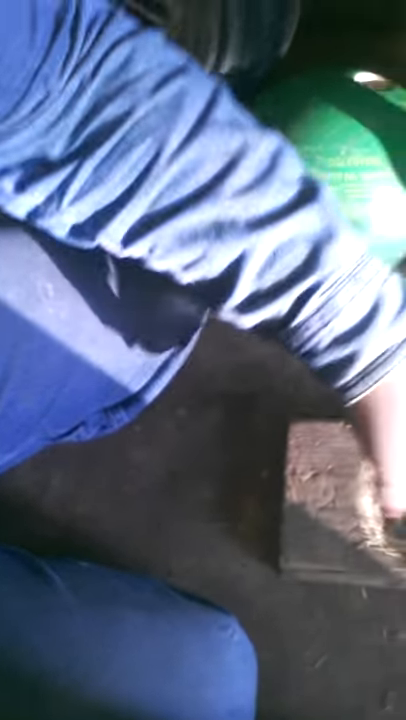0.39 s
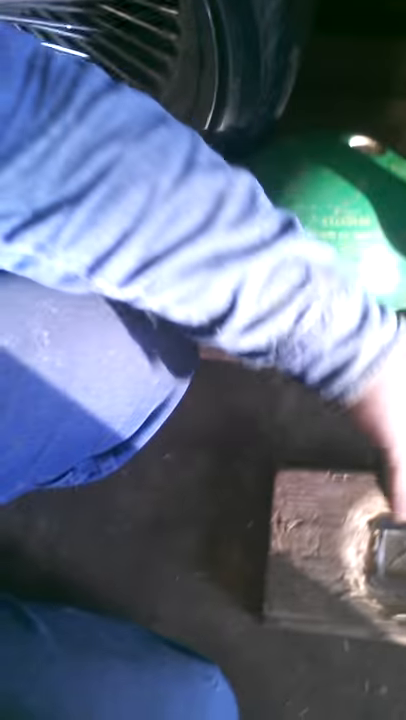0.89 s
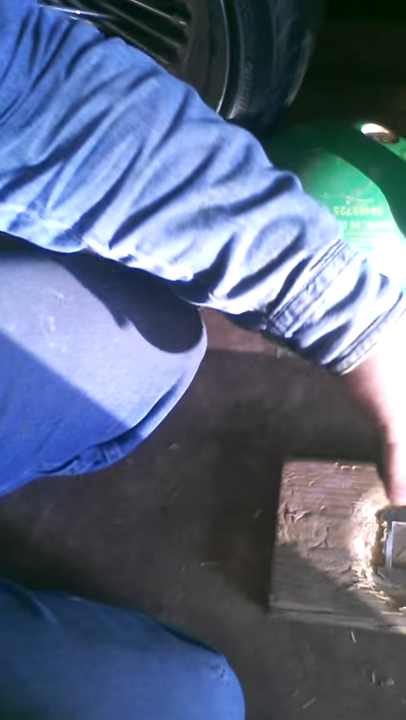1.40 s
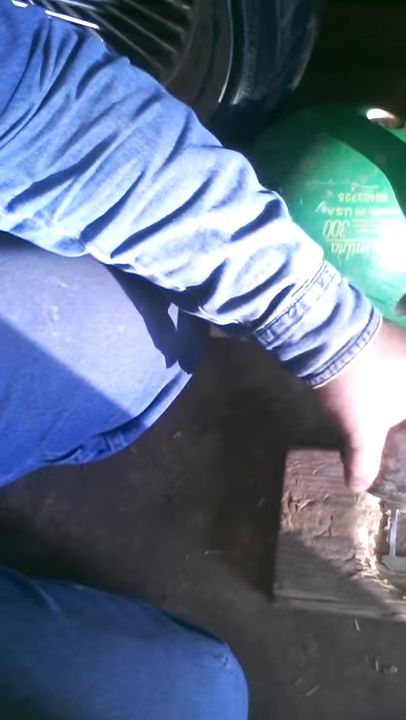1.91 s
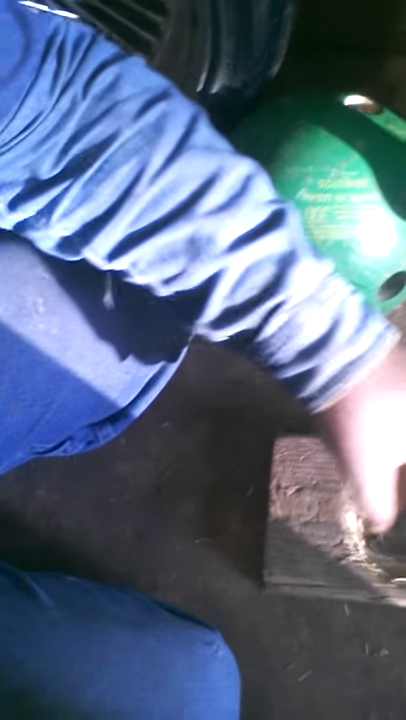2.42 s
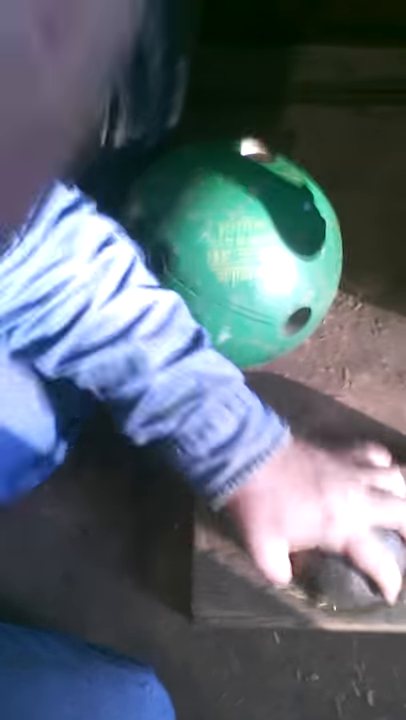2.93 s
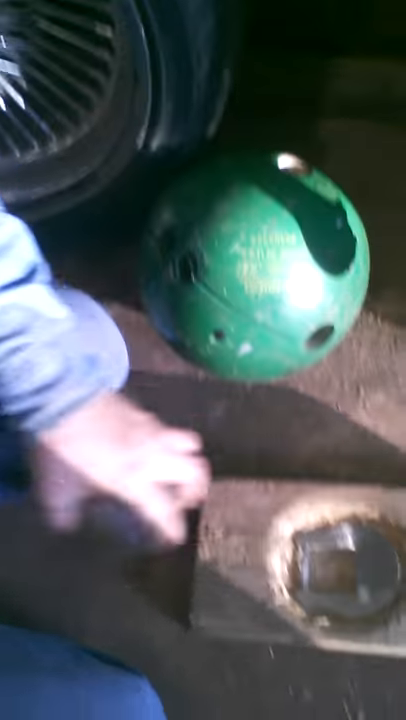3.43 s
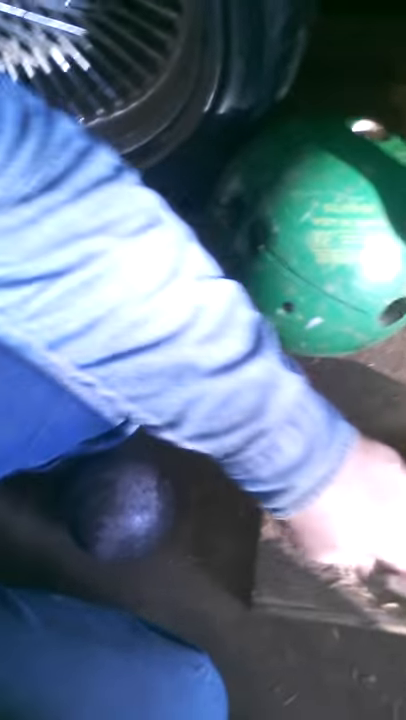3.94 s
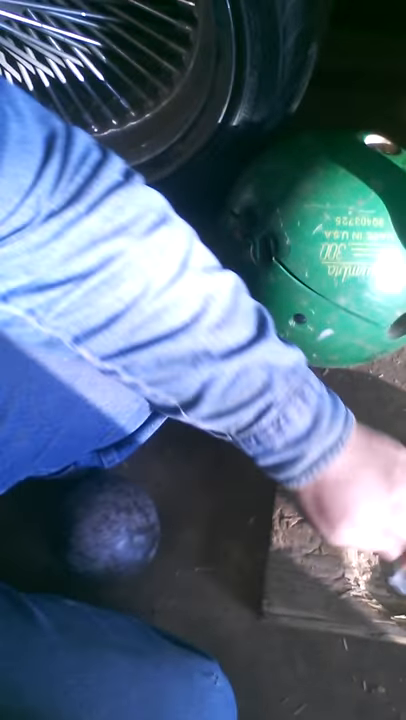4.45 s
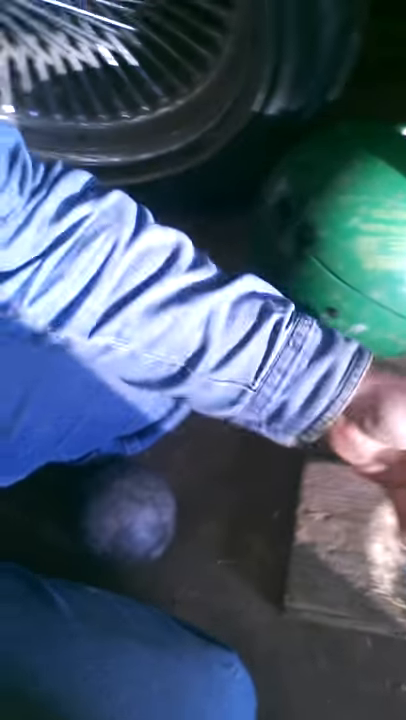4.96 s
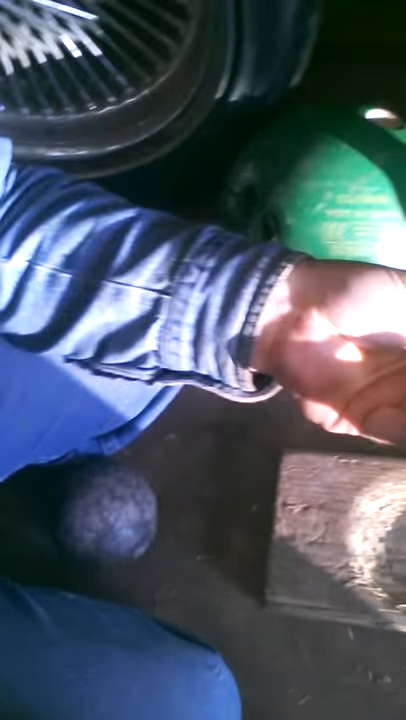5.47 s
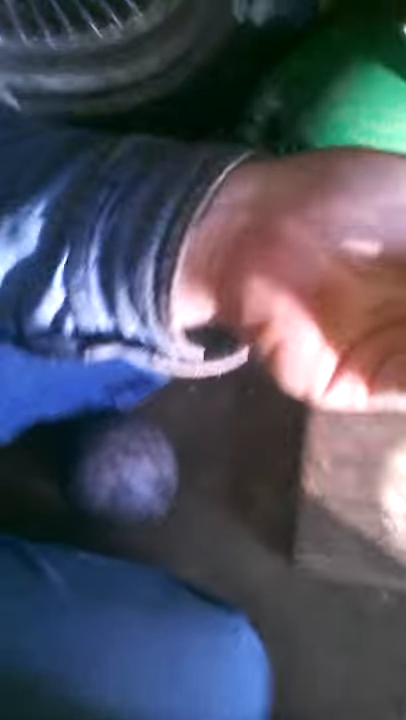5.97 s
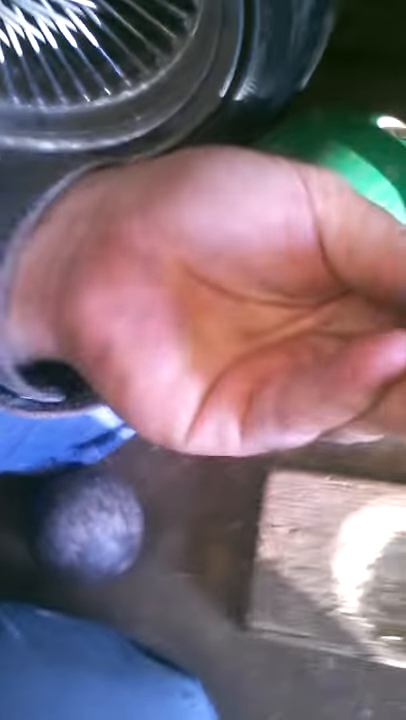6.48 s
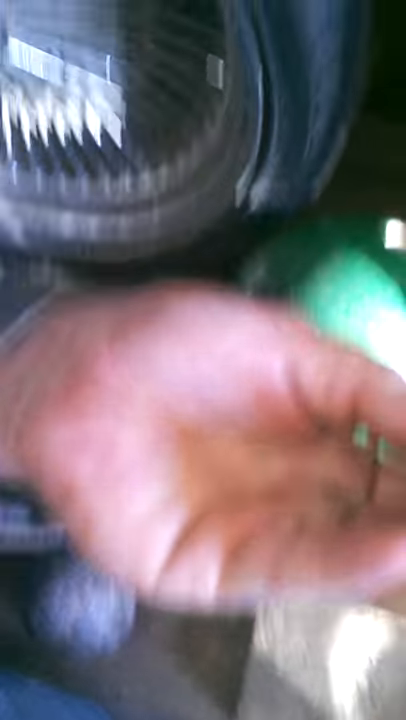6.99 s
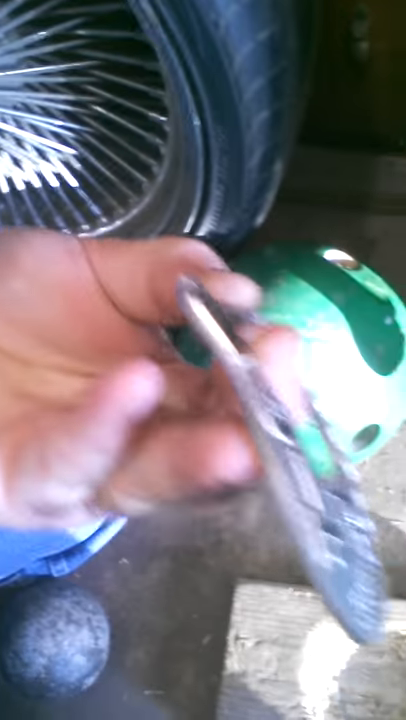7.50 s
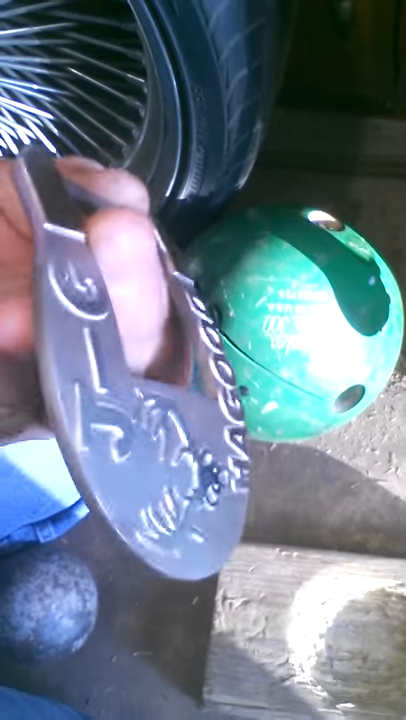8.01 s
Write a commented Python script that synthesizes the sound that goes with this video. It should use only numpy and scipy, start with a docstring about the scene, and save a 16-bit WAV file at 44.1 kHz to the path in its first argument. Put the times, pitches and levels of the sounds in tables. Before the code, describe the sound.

Close stereo pickup, overloading on impacts: one explosive clank of heavy ball on metal, short and dense, with wooden body underneath and a brief room tail. Over two seconds later a second clank, doubled by a rebound and sharp clinks. Soon a heavy floor thud patters into quicker, weaker hops and a faint decaying hum. Two slight metallic ticks, then quiet workshop air: soft distant rush, wavering low hum, hiss, and one thin faint squeak near the end.

```python
"""Heavy ball in a workshop

A heavy ball drops twice on a metal blank in a wooden block: short forces ring resonances, with cracks of noise.
The blank clinks (noise bursts) at the second blow and as it is lifted. Set on the floor, the ball thuds in ever
shorter hops and sets decaying tones humming. A faint squeak (gliding tone), a distant fan-like rush (shaped
noise) and a hum (wavering tones) fill the room; two microphones a hand apart overload on every blow."""
import sys
import numpy as np
from scipy import signal
from scipy.fft import rfft, irfft, next_fast_len
from scipy.io import wavfile
from scipy.ndimage import uniform_filter1d

SR = 44100
rng = np.random.default_rng(int(sys.argv[2]) if len(sys.argv) > 2 else 0)


def volts(x):
    """Linear amplitude factor 10**(x/20) for a level x in dB, scalar or array-like."""
    e = np.asarray(x, float) / 20
    return 10 ** e


def store_pcm(level_fs):
    """Save levels as 16-bit WAV."""
    pcm = np.round(np.clip(level_fs, -1, 1) * 32767).astype(np.int16)
    wavfile.write(sys.argv[1], SR, np.atleast_2d(pcm).T)


N = 358091
TAIL = 30000  # samples kept of each event
SPACING_M = 0.13  # between the microphones
SOUND_M_PER_S = 343


def blows(mix):
    """Steel on steel: a short force rings blank and block, with a crack of noise."""
    # ball on blank, the last a rebound: (time [s], blow [dB], block thud re ring [dB], crack re ring [dB],
    # contrast of the blank's modes [factor on their dB], lower for a blow off the middle)
    strikes = [(0.5729, 18.07, -19, -25.5, 0.82), (2.9739, 17.86, -17, -22, 0.63),
               (3.011, 2, -8, -23.5, .5)]
    # modes of blank and ball: (frequency [Hz], width [Hz], level [dB])
    blank = [(929, 195, -8.5), (1160, 120, -3), (1327, 170, -6), (1714, 228, -0.5), (2117, 200, -2.5),
             (2390, 250, -6.5), (2607, 260, -1.5), (2903, 380, -4.5), (3320, 700, -14), (4480, 1600, -20.5),
             (10400, 4000, -22.5)]
    # modes of the block under the blow: (frequency [Hz], width [Hz], level [dB])
    block = [(154.1, 39, 0), (241, 51, -1), (306, 181, -2), (607, 250, -8)]
    crack_t60_s = 0.0087
    t = np.arange(TAIL) / SR
    for start_s, blow_db, thud_db, crack_db, contrast in strikes:
        crack = volts(crack_db - 60 * t / crack_t60_s) * rng.standard_normal(TAIL)
        blank_modes = [(hz, width_hz, contrast * db) for hz, width_hz, db in blank]
        ring = rung(push(0.00008), blank_modes)
        thud = rung(push(0.00089), block)
        hit = ring + volts(thud_db) * thud + crack
        add(mix, start_s, volts(blow_db) * in_room(hit, wet_db=2.5, share=-0.2, gap_s=0.00057))


def clinks(mix):
    """Small metal contacts: a broad tick and a short burst of noise in one resonance."""
    # contacts of the blank: (time [s], level [dB], pitch [Hz], t60 [s])
    taps = [(2.9957, -0.5, 9700, 0.026), (3.018, -15.5, 8740, .012), (4.498, -47, 7900, 0.2),
            (4.57, -35, 4070, 0.072)]
    tick_db, tick_t60_s, tick_edge_hz = -5.5, 0.045, 3800  # level ahead of the high-pass
    t = np.arange(TAIL) / SR
    for start_s, db, hz, t60_s in taps:
        burst = volts(-60 * t / t60_s) * rng.standard_normal(TAIL)
        burst = rung(burst, [(hz, 45 / t60_s, 0)])  # briefer = broader
        tick = volts(tick_db - 60 * t / tick_t60_s) * rng.standard_normal(TAIL)
        tick = filtered(tick, lambda f: (1j * f / (1j * f + tick_edge_hz)) ** 4)
        add(mix, start_s, volts(db) * in_room(burst + tick, wet_db=-6, share=-0.21, gap_s=0.004))


def bounces(mix):
    """A slow heavy contact thuds and rings the floor; two near surfaces answer each thud clearly."""
    # the ball's own short thud: (frequency [Hz], width [Hz], level [dB])
    ball = [(440, 480, 0)]
    # modes of the floor under the ball: (frequency [Hz], width [Hz], level [dB])
    floor = [(138, 38, -0.5), (205.6, 35, 3.5), (318.5, 55, -5.5), (377, 32, 5), (410, 15, -7.5),
             (538, 30, -4.5), (660, 74, -0.5), (850, 75, -23), (1160, 91, -16), (1430, 460, -9.5),
             (2320, 2200, -8.5)]
    landing_s, landing_db = 3.785, 10  # let go just above the floor
    grit_db, grit_t60_s = -34, 0.016  # dirt crunching under each contact, re knock at landing
    grit_db_per_db = 0.2  # extra loss per dB of weaker contact: grit fades faster than the thud
    force = push(0.0007)
    thud = rung(rung(force, ball), ball)
    echo_1 = volts(-9) * np.roll(thud, round(0.0127 * SR))
    echo_2 = volts(-12.5) * np.roll(thud, round(0.0258 * SR))
    knock = thud + echo_1 + echo_2 + volts(-8.5) * rung(force, floor)
    hits = contacts(landing_s, landing_db, count=9)
    t = np.arange(TAIL) / SR
    for start_s, db in hits:
        level_db = grit_db + grit_db_per_db * (db - landing_db)
        grit = volts(level_db - 60 * t / grit_t60_s) * rng.standard_normal(TAIL)
        add(mix, start_s, volts(db) * in_room(knock + grit, wet_db=-7.5, share=0.25, gap_s=0.0067))
    add(mix, hits[2][0], humming())  # from the second rebound


def contacts(landing_s, landing_db, count):
    """(time [s], level [dB]) of landing and rebounds: each hop shorter and weaker by fixed shares."""
    first_hop_s, shrink = 0.0493, 0.66  # shrink: each flight over the one before
    rebound_db, loss_db = 8.5, 5  # first rebound, loss with each further one
    k = np.arange(count)
    times_s = landing_s + np.cumsum(first_hop_s * shrink ** k)
    return [(landing_s, landing_db), *zip(times_s, rebound_db - loss_db * k)]


def humming():
    """Something loose that the bounces set humming: decaying tones with a soft onset."""
    # tones: (frequency [Hz], level [dB], t60 [s])
    partials = [(194, -38, 0.94), (494, -43.5, 4), (668, -39.5, 1.2)]
    t = np.arange(3 * SR) / SR
    tones = sum(volts(db - 60 * t / t60_s) * np.sin(2 * np.pi * hz * t) for hz, db, t60_s in partials)
    return lagged(tones * (1 - np.exp(-t / 0.03)), share=0.66)


def squeak():
    """One faint, thin, slightly rough gliding tone."""
    # glide: (time [s], frequency [Hz], level [dB])
    glide = [(7.15, 5100, -95), (7.19, 5300, -76), (7.3, 5350, -76), (7.335, 4950, -71), (7.36, 4850, -95)]
    s, hz, db = np.transpose(glide)
    t = np.arange(N) / SR
    rough = 1 + 0.6 * unit(uniform_filter1d(rng.standard_normal(N), size=300))
    phase = 2 * np.pi * np.cumsum(np.interp(t, s, hz)) / SR
    return lagged(volts(np.interp(t, s, db)) * rough * np.sin(phase), share=0.04)


def rush():
    """Distant fan-like noise, partly from one side and partly from all sides."""
    # spectrum: (frequency [Hz], relative density [dB per Hz])
    spectrum = [(24, -64), (40, -17), (108, -16), (198, -9.5), (225, -14.5), (318, -6.5), (404, -8.5),
                (501, -12.5), (535, -10), (583, -9.5), (724, -12.5), (938, -8.5), (1270, -12.5),
                (2890, -20), (7000, -36), (9100, -59), (15400, -120)]
    # course: (time [s], rms level [dB])
    course = [(0, -48.5), (2.497, -48.5), (5.001, -48), (8.12, -49.5)]
    noise = rng.standard_normal((3, N))
    field = 0.48 * lagged(noise[0], share=0.89) + 1.01 * diffuse(noise[1:], reach=1.66)
    level = volts(np.interp(np.arange(N) / SR, *np.transpose(course)))
    return level * unit(filtered(field, lambda hz: volts(along(spectrum, hz))))


def hum():
    """Steady tones, each wandering in pitch and slowly swelling and sinking."""
    # tones: (frequency [Hz], mid level [dB], rms unsteadiness [Hz])
    partials = [(121, -63, 0.2), (314, -61.5, 1.1), (360, -59, 1.5), (629, -70.5, 2.2)]
    swell_db, swell_s = 3.5, 0.46  # rms swell, smoothing time
    size = round(swell_s * SR)
    tones = 0
    for hz, db, wander_hz in partials:
        drift = np.cumsum(wander_hz * unit(uniform_filter1d(rng.standard_normal(N), 3000)))
        swell = unit(uniform_filter1d(uniform_filter1d(rng.standard_normal(N), size), size))
        phase = 2 * np.pi * (hz * np.arange(N) + drift) / SR
        tones = tones + volts(db + swell_db * swell) * np.sin(phase)
    return lagged(tones, share=0.92)


def microphone_noise():
    """Each microphone's own rumble and hiss: independent shaped noises."""
    # hiss: (frequency [Hz], relative density [dB per Hz])
    spectrum = [(2000, 0.5), (5000, -7.5), (9000, -4), (14000, -0.5), (16000, -8)]

    def rumble_shape(hz):
        rise = (hz / 90) ** 3
        return rise / (1 + rise) / (1 + (hz / 300) ** 2)

    rumble = unit(filtered(rng.standard_normal((2, N)), rumble_shape))
    hiss = unit(filtered(rng.standard_normal((2, N)), lambda hz: volts(along(spectrum, hz)) * (hz < 17000)))
    return volts(-62.5) * rumble + volts(-56.5) * hiss


def unit(x):
    """Rms 1."""
    return x / np.sqrt(np.mean(x ** 2) + 1e-20)


def along(points, hz):
    """(frequency [Hz], value) points read on a log frequency axis."""
    f, v = np.transpose(points)
    return np.interp(np.log(hz + 1), np.log(f + 1), v)


def filtered(x, response):
    """x times a complex response of frequency."""
    n = x.shape[-1]
    m = next_fast_len(n + SR // 4)
    return irfft(rfft(x, m) * response(np.fft.rfftfreq(m, 1 / SR)), m)[..., :n]


def push(length_s):
    """Half-sine contact force."""
    return np.sin(np.pi * np.clip(np.arange(TAIL) / SR / length_s, 0, 1))


def rung(x, modes):
    """x through parallel resonances of alternating sign, peak 1."""
    def response(f):
        return sum((-1) ** k * volts(db) * 1j * f * width / (hz * hz - f * f + 1j * f * width)
                   for k, (hz, width, db) in enumerate(modes))

    y = filtered(x, response)
    return y / np.abs(y).max()


def diffuse(pair, reach):
    """Two noises made as alike as sound from all sides is at two spaced microphones."""
    def blend(hz):
        likeness = np.sinc(2 * hz * reach * SPACING_M / SOUND_M_PER_S)
        angle = np.arccos(np.clip(likeness, -1, 1)) / 2
        return np.array([np.cos(angle), np.sin(angle)])

    mid, side = filtered(pair, blend)
    return np.array([mid + side, mid - side])


def lagged(x, share):
    """One sound reaching the left microphone later by a share of the travel time across the spacing."""
    delay_s = share * SPACING_M / SOUND_M_PER_S
    halves = np.array([[1], [-1]])
    return filtered(np.array([x, x]), lambda hz: np.exp(-1j * np.pi * hz * delay_s * halves))


def in_room(x, wet_db, share, gap_s):
    """Direct sound and a fresh noise tail in which each frequency dies at its own speed."""
    # early decay of the room: (frequency [Hz], t60 [s])
    decay = [(60, .68), (150, 0.82), (500, 0.52), (1400, 0.6), (2700, 0.6), (4000, 0.57), (7000, 0.48),
             (12000, 0.38)]
    bend_db_per_s2 = 71.5  # the tail fades ever faster
    hz, t, z = signal.stft(rng.standard_normal((2, TAIL)), SR, nperseg=256)
    fade_db = -60 * t / along(decay, hz)[:, None] - bend_db_per_s2 * t ** 2
    noise = signal.istft(z * volts(fade_db), SR, nperseg=256)[1][:, :TAIL]
    t = np.arange(TAIL) / SR
    onset = 1 - np.exp(-t / gap_s)
    early = 1 + 4.45 * np.exp(-t / 0.0082)  # floor and near objects answer first and strongest
    tail = diffuse(noise, reach=1.1) * onset * early
    wet = signal.fftconvolve(x[None], tail / np.linalg.norm(tail[0]), axes=1)[:, :len(x)]
    return lagged(x, share) + volts(wet_db) * wet


def add(mix, start_s, x):
    """Lay x into the mix at a time."""
    part = mix[:, round(start_s * SR):][:, :x.shape[1]]
    part += x[:, :part.shape[1]]


def scene():
    """All sources at the two microphones."""
    mix = rush() + hum() + microphone_noise() + squeak()
    for source in (blows, clinks, bounces):
        source(mix)
    return mix


def top_cut(x):
    """Nothing passes above the cut-off."""
    return signal.sosfilt(signal.butter(12, 15750, fs=SR, output="sos"), x)


def record(dry):
    """Bass and treble roll-off, a slightly hotter left side, a hard overload at full scale, a last low-pass."""
    side_gain = volts(np.array([[0.3], [-0.3]]))
    x = side_gain * filtered(dry, lambda hz: (1j * hz / (1j * hz + 45)) ** 2 / (1 + 1j * hz / 14000) ** 2)
    x = x / (1 + np.abs(x) ** 16) ** (1 / 16)
    x = filtered(x, lambda hz: 1 / (1 + (hz / 15500) ** 12))
    return top_cut(x)


dry = scene()
out = record(dry)
store_pcm(out)
```